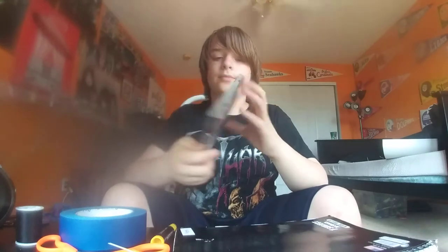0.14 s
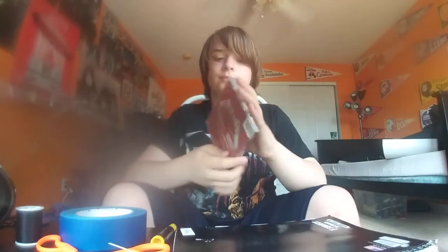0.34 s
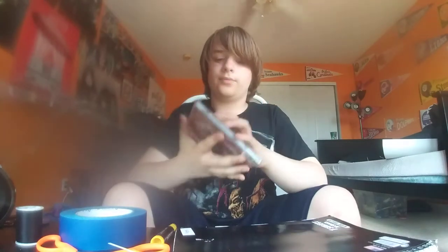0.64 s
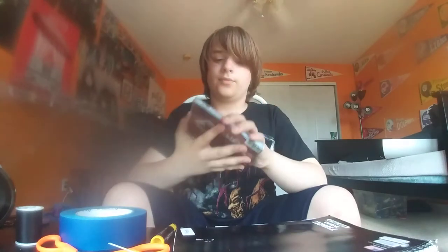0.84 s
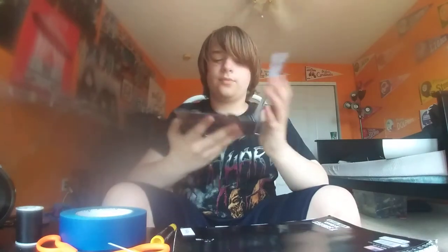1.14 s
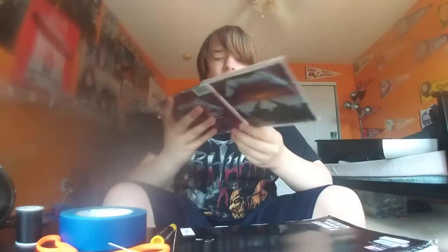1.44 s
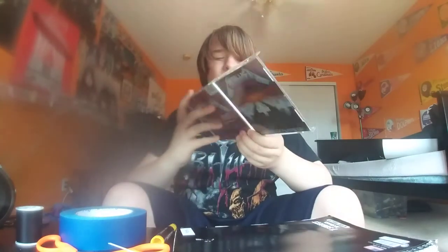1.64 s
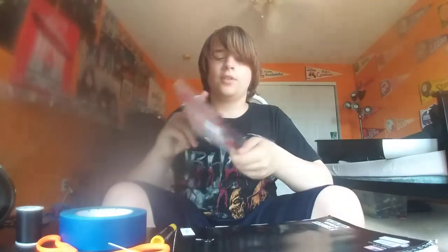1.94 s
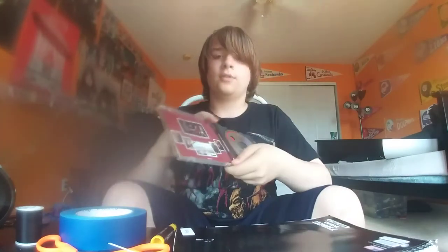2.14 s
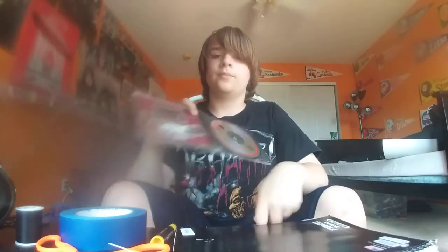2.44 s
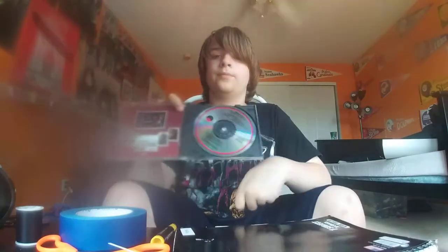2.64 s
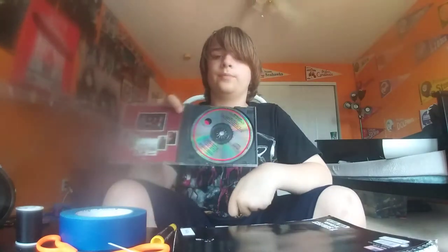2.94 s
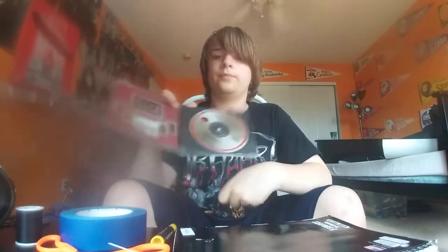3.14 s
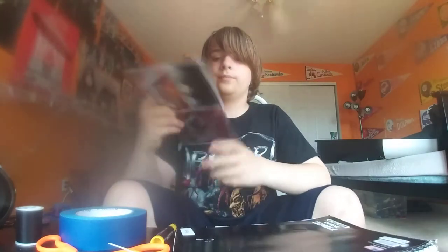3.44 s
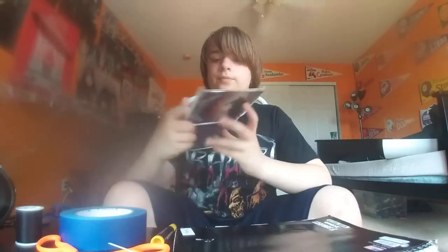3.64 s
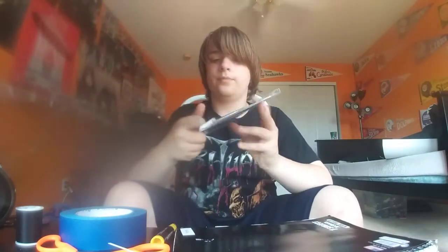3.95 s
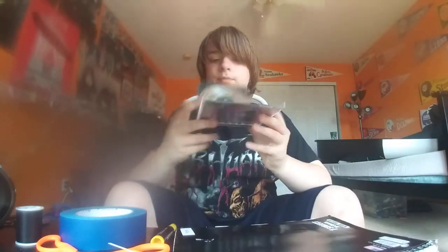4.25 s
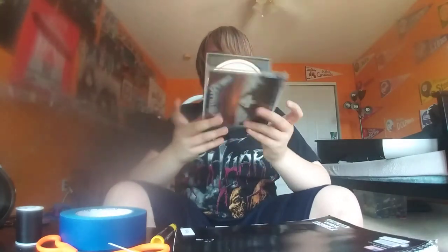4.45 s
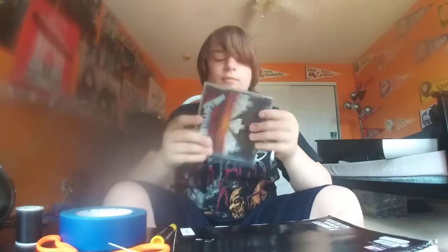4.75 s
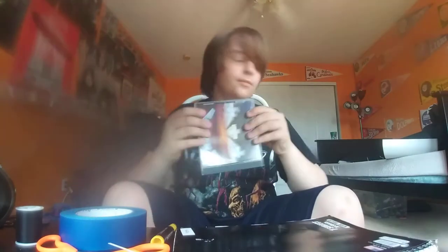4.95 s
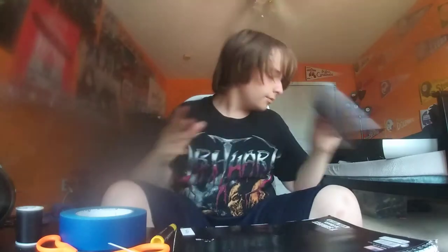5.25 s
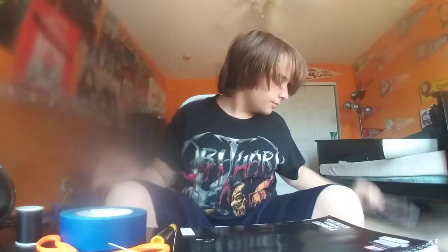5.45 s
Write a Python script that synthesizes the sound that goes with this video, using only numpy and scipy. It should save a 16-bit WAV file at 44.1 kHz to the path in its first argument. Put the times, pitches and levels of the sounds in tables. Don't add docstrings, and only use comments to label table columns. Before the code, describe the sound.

Close handling of a thin hard-plastic disc case in a small furnished room, over a quiet low fan hum and faint broad air. From 0 to 0.8 s come light ticks, dull finger taps and a soft skin slide, with a clear click near 0.5 s. A dry plastic click falls at 1.0 s and a brighter, stronger edge click at 1.3 s, then small lid ticks and a modest click at 2.03 s. Faint knocks follow around 2.4 to 2.5 s. Between 3.1 and 3.35 s the case swings and the disc rattles in a rapid cluster with rubbing, plus a click at 3.6 s. A sparse, quiet stretch leads to slight scuffs at 4.4 s. Loud, crisp snaps arrive at 4.55 and 4.77 s, with a smaller click between. Soft knocks, taps and sliding skin trail off until about 5.5 s. Reflections are short; deep bass is thin.

```python
import sys
import numpy as np
from scipy import signal
from scipy.fft import rfft, irfft, next_fast_len
from scipy.io import wavfile
from scipy.ndimage import uniform_filter1d, map_coordinates

SR = 44100
rng = np.random.default_rng(int(sys.argv[2]) if len(sys.argv) > 2 else 0)


def persist_wave(psi):
    counts = np.round(np.clip(psi, -1, 1) * 32767).astype(np.int16)
    wavfile.write(sys.argv[1], SR, np.atleast_2d(counts).T)


def voltage_ratio(level):
    return 10 ** (np.asarray(level, float) / 20)


N = 247621
SIZE, LEAD = 16384, 256


def case():
    return snaps() + catches() + ticks() + knocks() + taps() + rattles() + scuffs()


# [start_s, level_db, push_db, pitch_hz]
SNAPS = [(0.9854, -43, -6, 3090), (0.9926, -31.5, -13, 2108), (1.5382, -51.5, -44, 3220),
         (1.5878, -45.5, -6, 2960), (1.6945, -56, -17, 3100), (2.0287, -31.5, -23, 3200),
         (2.0344, -48, -20, 3170), (2.0911, -44.5, -3, 1980), (2.6099, -43, -10, 2160),
         (2.637, -45.5, -4.5, 1147), (2.814, -59, -7, 3240), (2.8464, -56, -17, 3160),
         (2.9736, -59, -8, 3080), (3.0972, -37, -14, 3170), (3.2044, -36, -14, 3800),
         (3.2744, -35, -12, 2120), (3.431, -54, 2, 2370), (3.532, -59, -5, 1130),
         (3.5795, -31.5, -12.5, 2190), (4.121, -43, -35, 3290), (4.3895, -40, -21, 3400),
         (4.5481, -13.5, -16, 2960), (4.7078, -26.5, -18.5, 2400)]


def snaps():
    return struck(*columns(SNAPS), lid_db=-12.5, edge_db=-28, chatter_s=0.0029)


# [start_s, level_db, push_db, pitch_hz]
CATCHES = [
    (4.5111, -50, -8, 3130),
    (4.5438, -20, -11.5, 3290),
    (4.7669, -14.5, -8.5, 3496),
    (4.552, -24, -24, 1500),
]


def catches():
    return struck(*columns(CATCHES), lid_db=-12, edge_db=-8, chatter_s=0.002)


# [start_s, level_db, push_db, pitch_hz]
TICKS = [(0.0673, -36, -14, 1440), (0.351, -56.5, -11, 1860), (0.5012, -29.5, -8, 2265),
         (0.5585, -34.5, -8, 1370), (1.0834, -43.5, -8, 2140), (1.1588, -52.5, -27, 5010),
         (1.951, -47.5, -2, 4580), (2.137, -50.5, -5, 1130), (2.3534, -57.5, -2, 980),
         (2.5354, -49, -4, 1180), (2.7312, -51, -4, 3100), (4.4366, -43.5, -26, 3220),
         (1.3002, -22.5, -15.5, 3310), (5.1398, -51, 2, 1280), (5.1681, -55.5, 8, 2280)]


def ticks():
    return struck(*columns(TICKS), lid_db=-13.5, edge_db=-11.5, chatter_s=0.0025)


# [start_s, level_db, push_db, pitch_hz]
KNOCKS = [(0.129, -30.5, -13.5, 1500), (0.4034, -51.5, 3.5, 1360), (0.6725, -44, -3.5, 1322),
          (0.6963, -48.5, -4, 2980), (0.711, -41, -16, 1960), (1.0226, -43, -18, 3300),
          (1.057, -44.5, -9, 3400), (1.6044, -52.5, -9, 2550), (1.6387, -49.5, 2.5, 2610),
          (2.1869, -56.5, -10, 2100), (2.435, -47, 15, 2820), (2.4427, -35.5, -7, 3230),
          (2.455, -44, 7, 2560), (2.5222, -53, 6, 3180), (2.7901, -44, -8, 3120),
          (3.8419, -46.5, -4.5, 2300), (4.7712, -15.5, -22.5, 1930), (4.9345, -31.5, -15, 2040),
          (4.9826, -43, -5, 1380), (5.0821, -50, 1, 1760), (5.129, -42.5, -1.5, 1220),
          (5.1707, -47.5, -7.5, 2450)]


def knocks():
    return struck(*columns(KNOCKS), lid_db=-4, edge_db=-9, chatter_s=0.0029)


# [start_s, level_db, push_db, pitch_hz]
TAPS = [(0.1315, -28, -6, 3100), (0.2685, -46.5, 0.5, 1403), (0.301, -46, -2, 1570),
        (0.4519, -43, -12, 1543), (0.5095, -39, -20, 1530), (0.7354, -51.5, -6, 1640),
        (0.8784, -57.5, -2, 1314), (1.3236, -36, -14, 2640), (1.7579, -56.5, 8.5, 1420),
        (3.111, -39, -5, 3190), (3.3006, -39, -9, 2900), (3.4395, -43.5, -24, 2510),
        (4.036, -47, -0.5, 1107), (4.2763, -57, -1, 1050), (4.9703, -43, -5, 2610),
        (5.1053, -51, 8.5, 1940), (5.4142, -58.5, -7, 1324)]


def taps():
    return struck(*columns(TAPS), lid_db=-3, edge_db=-20, chatter_s=0.0035)


# [start_s, level_db, push_db, pitch_hz]
RATTLES = [
    (3.1226, -34.5, -13, 3290),
    (3.1304, -32, -16, 2140),
    (3.172, -37, -17, 2650),
    (3.1813, -33, -8.5, 3190),
    (3.2342, -31, -23, 2900),
    (3.239, -33, -20, 3870),
    (3.253, -26, -20, 2160),
    (3.3148, -27.5, -17, 2130),
    (3.3283, -34, -11.5, 2160),
    (3.6045, -38.5, -3, 2140),
]


def rattles():
    return struck(*columns(RATTLES), lid_db=-10.5, edge_db=-15.5, chatter_s=0.0025)


# [start_s, level_db, lid_db, pitch_hz, chatter_s]
SCUFFS = [(0.494, -43.5, 11.5, 1500, 0.0083), (0.549, -48, 2, 1370, 0.0082), (0.97, -41, -2.5, 2160, 0.026),
          (1.28, -39.5, -3, 3320, 0.013), (3.231, -33, -12, 1130, 0.0038), (3.573, -42, -6, 3760, 0.0061),
          (4.362, -48.5, -5, 3260, 0.02), (4.368, -42, -19, 3320, 0.025),
          (4.377, -42.5, -20.5, 5200, 0.0049), (4.702, -40.5, -2.5, 1395, 0.0046),
          (4.743, -43.5, 1.5, 3400, .003), (4.7658, -32, 7.5, 3330, 0.001), (3.844, -55.5, -2, 2980, 0.026),
          (4.038, -56, -5, 2380, 0.024), (0.454, -52, 2, 3030, 0.009), (3.614, -48.5, -17, 3900, 0.018),
          (4.166, -52.5, -2.5, 2100, 0.016), (4.402, -47.5, -12, 3400, .006), (1.335, -43, -11, 4200, .025)]


def scuffs():
    start_s, level_db, lid_db, pitch_hz, chatter_s = columns(SCUFFS)
    return struck(start_s, level_db, -9, pitch_hz, lid_db, edge_db=-16, chatter_s=chatter_s)


def struck(start_s, level_db, push_db, pitch_hz, lid_db, edge_db, chatter_s):
    f = np.fft.rfftfreq(SIZE, 1 / SR)
    force = chatter(len(start_s), chatter_s)

    def near(width):
        return 1j * f * width / (pitch_hz ** 2 - f * f + 1j * f * width)

    body = panels(force, f, near(width=1400))
    body = body + voltage_ratio(lid_db) * lid(force, f)
    body = body + voltage_ratio(push_db + 2) * hollow(force, f)
    body = body + voltage_ratio(edge_db) * edges(force, f)
    free = voltage_ratio(-5.5) * level(force * near(width=45 * (pitch_hz / 2100) ** 1.4) * near(width=300))
    wet = walls(body + 0.18 * free, f, delay_s=chatter_s + 0.0045)
    sound = np.roll(irfft(body + free + voltage_ratio(-7.5) * wet, SIZE), LEAD, axis=1)
    at = np.round(start_s * SR).astype(int) + np.arange(SIZE)
    return np.bincount(at.ravel(), (voltage_ratio(level_db - 4) * sound).ravel(), N + SIZE)[LEAD:N + LEAD]


def chatter(count, chatter_s):
    t = np.arange(SIZE // 4) / SR
    u = t / np.clip(chatter_s, 5e-4, 0.03)
    shape = (count, len(t))
    jolts = rng.standard_normal(shape) * voltage_ratio(3 * rng.standard_normal(shape))
    force = rfft(jolts * (1 - np.exp(-u * 3)) * np.exp(-u), SIZE)
    return force / smoothed(force, size=240)


# [pitch_hz, width_hz, level_db]
PANEL = [(1980, 100, -4.5), (2160, 55, 10), (2610, 200, -8.5), (2960, 36, 2), (3220, 306, -2),
         (3290, 86, 3.5), (3550, 63, -9.5), (4370, 255, -7), (4780, 130, -25)]


def panels(force, f, near):
    driven = force * above(f, 1550) * below(f, 4200) ** 2 * (1.1 + near)
    return level(driven * (grip(PANEL, force, f) + 0.97))


# [pitch_hz, width_hz, level_db]
LID = [(1027, 200, -8.5), (1130, 29, 4.5), (1337, 33, 0), (1500, 70, 2), (1750, 50, -7)]


def lid(force, f):
    return level(force * above(f, 800) * below(f, 1860) * (grip(LID, force, f) + 0.25))


# [pitch_hz, width_hz, level_db]
HOLLOW = [(291.6, 93, -1), (405, 126, -2), (460.4, 55, 4), (652, 98, 4.5), (868, 55, 2)]


def hollow(force, f):
    return level(force * grip(HOLLOW, force, f) / (1 + 1j * f / 900) ** 2)


# [pitch_hz, width_hz, level_db]
EDGE = [(5200, 590, -1), (5880, 840, -1.5), (7530, 1900, 9), (7920, 860, 14), (10670, 2900, -5),
        (14360, 2100, -9.5)]


def edges(force, f):
    return level(force * grip(EDGE, force, f) * above(f, 4000))


def grip(table, force, f):
    return voltage_ratio(2.6 * rng.standard_normal((len(force), len(table)))) @ modes(table, f)


# [pitch_hz, level_db]
WALLS = [(300, 1), (1000, 0), (1600, 2.5), (3300, -2.5), (6000, -3), (9000, -0.5)]


def walls(spectra, f, delay_s):
    evened = smoothed(spectra, size=45) * voltage_ratio(along(WALLS, f))
    return evened * rfft(tails(len(spectra)), SIZE) * np.exp(-2j * np.pi * f * delay_s)


# [pitch_hz, fade_s]
ROOM = [(250, 0.32), (700, 0.32), (2000, 0.24), (4000, 0.28), (9000, 0.26), (15000, 0.11)]


def tails(count):
    hz, t, z = signal.stft(rng.standard_normal((count, SIZE * 3 // 4)), SR, nperseg=256)
    tail = signal.istft(z * voltage_ratio(-60 * t / along(ROOM, hz)[:, None]), SR, nperseg=256)[1]
    tail = tail * (1 - np.exp(-np.arange(tail.shape[1]) / SR / 0.001))
    return tail / np.linalg.norm(tail, axis=1, keepdims=True)


def port(x):
    return signal.sosfilt(signal.butter(3, 200, "high", fs=SR, output="sos"), x)


# [pitch_hz, level_db]
RUB = [(500, -31), (900, 0.5), (1400, 1.5), (2100, -14), (3200, -3.5), (4200, -9), (5500, -15.5),
       (8000, -43)]
# [pitch_hz, level_db]
SKIN = [(3500, -18.5), (5500, 2), (8000, 8), (10000, -4.5), (13000, 2.5), (15700, -2), (16000, -65.5)]


def fingers():
    grains = rng.standard_normal(N) * voltage_ratio(1.64 * wobble(170) + 3.8 * wobble(35))
    rub = shaped(grains, lambda f: voltage_ratio(along(RUB, f)) * (0.38 + np.abs(modes(PANEL, f).sum(axis=0))))
    hiss = shaped(rng.standard_normal(N) * voltage_ratio(2.7 * wobble(43)), lambda f: voltage_ratio(along(SKIN, f)))
    return voltage_ratio(pressure() - 4.5) * rub + voltage_ratio(-8) * gliding() * hiss


# [start_s, level_db]
SLIDE = [(0.0, -55), (0.12, -73), (0.58, -55.5), (0.78, -77), (1.1, -65.5), (1.83, -69.5), (2.05, -54.5),
         (2.3, -75), (2.64, -63), (2.87, -70), (3.16, -74.5), (3.27, -49), (3.37, -75.5), (4.42, -66.5),
         (4.61, -51), (4.76, -68), (5.08, -58), (5.4, -84.5)]


def pressure():
    s, db = np.transpose(SLIDE)
    return np.interp(np.arange(N) / SR, s, db)


# [middle_s, level_db, half_length_s]
STROKES = [
    (0.59, -56.5, 0.076),
    (1.17, -66, .12),
    (2.042, -72, 0.14),
    (3.25, -64, 0.11),
    (3.67, -82, 0.12),
    (4.6, -65, 0.074),
    (5.07, -63, .14),
    (3.79, -73, 0.033),
    (5.464, -68.5, 0.027),
]


def gliding():
    t = np.arange(N) / SR
    holding = voltage_ratio(-74)
    return holding + sum(voltage_ratio(db) * np.exp(-((t - s) / half) ** 2) for s, db, half in STROKES)


# [pitch_hz, width_hz, level_db]
HUM = [(111.3, 2.3, -14.5), (290.2, 15.8, -7.5), (379.6, 15, -14), (456, 17, -7), (529, 25, -9.5),
       (598.3, 23, -10.5), (737, 22.4, -9)]
# [pitch_hz, level_db]
AIR = [(15, -58.5), (25, -29.5), (108, -12), (166, -16), (285, -2.5), (394, -6.5), (503, -5), (734, -9),
       (840, -15), (1020, -8), (1330, -16), (3340, -20.5), (5880, -31), (14000, -32.5), (16000, -33)]


def room_air():
    def fan_colour(f):
        return modes(HUM, f).sum(axis=0) / (1 + (f / 900) ** 4) / (1 + (90 / (f + 1)) ** 4)

    def air_colour(f):
        return voltage_ratio(along(AIR, f)) * (1 + 0.7 * np.exp(-((f - 14000) / 600) ** 2))

    hum = shaped(rng.standard_normal(N), fan_colour)
    floor = shaped(rng.standard_normal(N), air_colour)
    return voltage_ratio(stirring() - 3.5 + 0.62 * wobble(18)) * hum + voltage_ratio(-66.5) * floor


def stirring():
    inertia_s, rise_per_db = 0.23, 0.31
    slow_db = uniform_filter1d(pressure(), round(inertia_s * SR))
    return -59.5 + rise_per_db * (slow_db - slow_db.mean())


def columns(rows):
    return np.transpose(rows)[:, :, None]


def unit(x):
    return x / np.sqrt(np.mean(x ** 2) + 1e-20)


def level(spectra):
    power = uniform_filter1d(irfft(spectra, SIZE) ** 2, size=88, axis=1)
    return spectra / np.sqrt(2 * np.abs(power).max(axis=1, keepdims=True))


def smoothed(spectra, size):
    return np.sqrt(np.abs(uniform_filter1d(np.abs(spectra) ** 2, size=size, axis=1)) + 1e-20)


def above(f, hz):
    return (1j * f / (hz + 1j * f)) ** 2


def below(f, hz):
    return hz * hz / (hz * hz - f * f + 1.1j * f * hz)


def along(points, hz):
    f, v = np.transpose(points)
    return np.interp(np.log(hz + 1), np.log(f + 1), v)


def wobble(rate):
    return map_coordinates(rng.standard_normal(int(N * rate / SR) + 4), [np.arange(N) * rate / SR])


def modes(table, f):
    hz, width, db = columns(table)
    sign = (-1.) ** np.arange(len(table))[:, None]
    return sign * voltage_ratio(db) * 1j * f * width / (hz * hz - f * f + 1j * f * width)


def shaped(x, gain):
    m = next_fast_len(N + 8192)
    return unit(irfft(rfft(x, m) * gain(np.fft.rfftfreq(m, 1 / SR)), m)[:N])


def scene():
    return (port(case()) + fingers() + room_air())[None]


def band_limit(x):
    return signal.sosfilt(signal.butter(12, 16500, fs=SR, output="sos"), x)


def record(dry):
    kept = signal.sosfilt(signal.ellip(10, 0.3, 40, 15850, fs=SR, output="sos"), dry)
    return band_limit(kept)


dry = scene()
out = record(dry)
persist_wave(out)
```